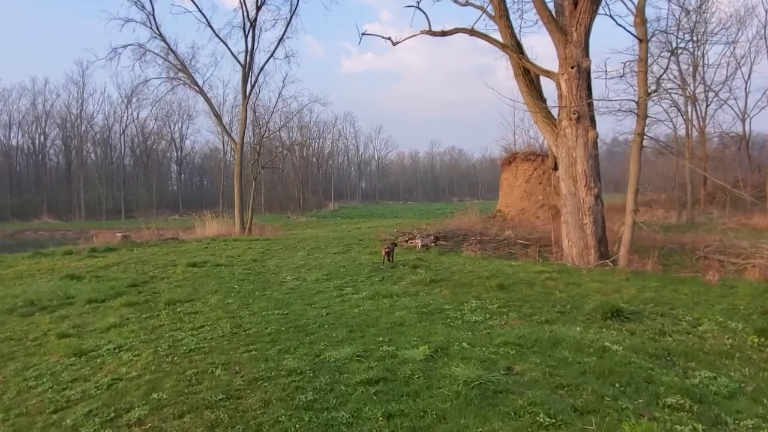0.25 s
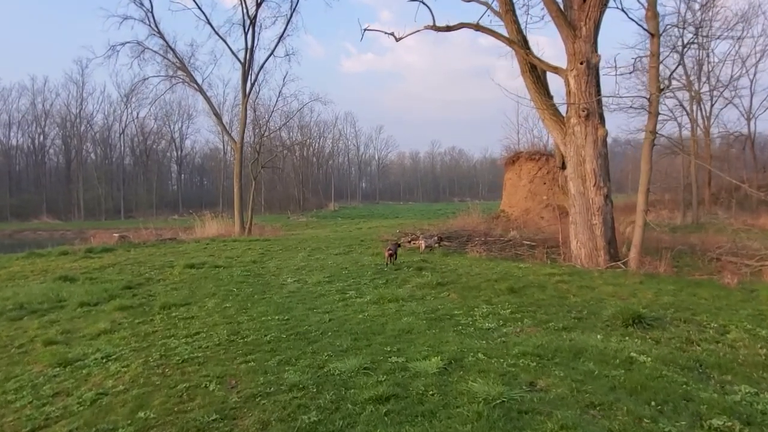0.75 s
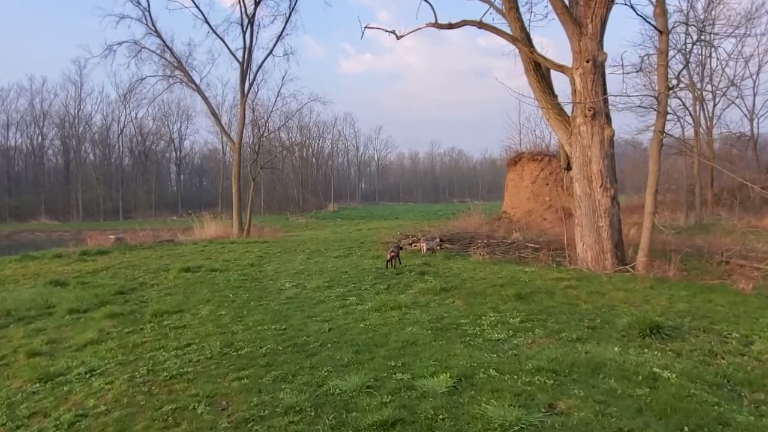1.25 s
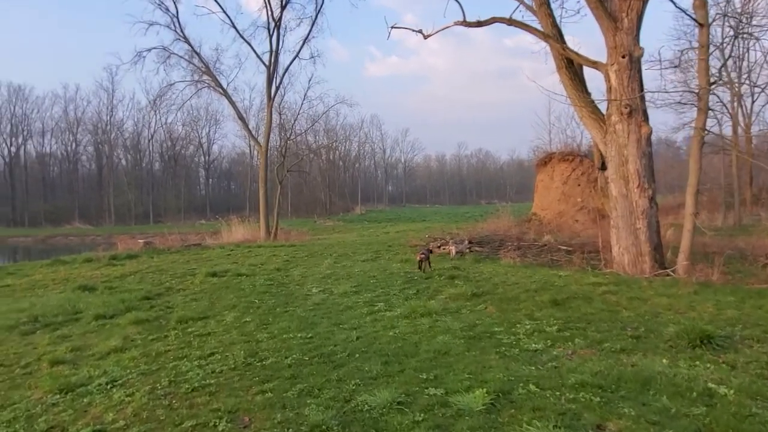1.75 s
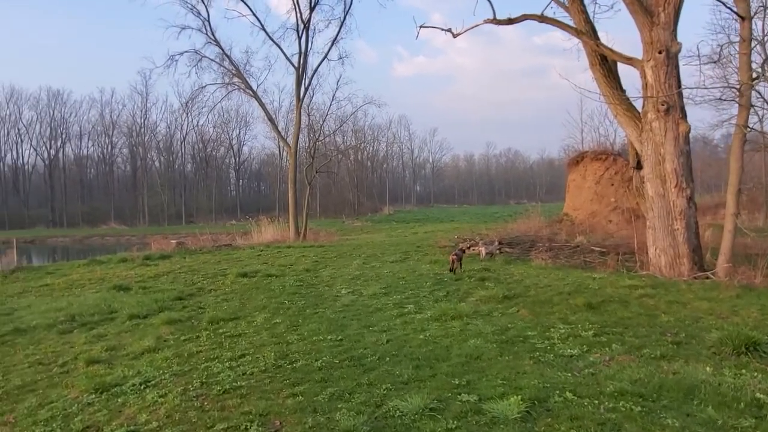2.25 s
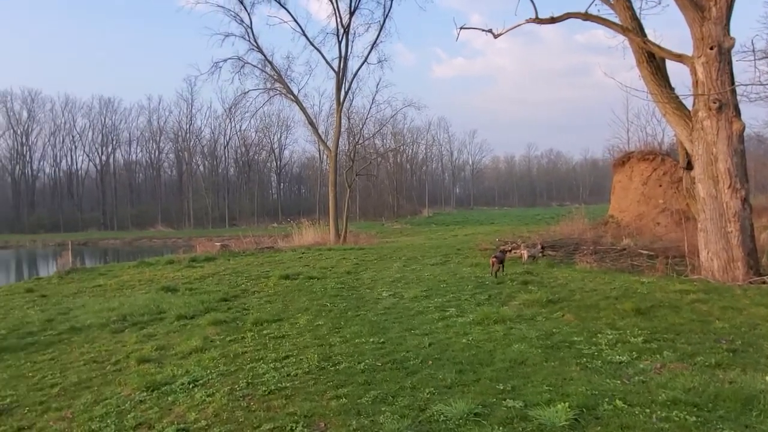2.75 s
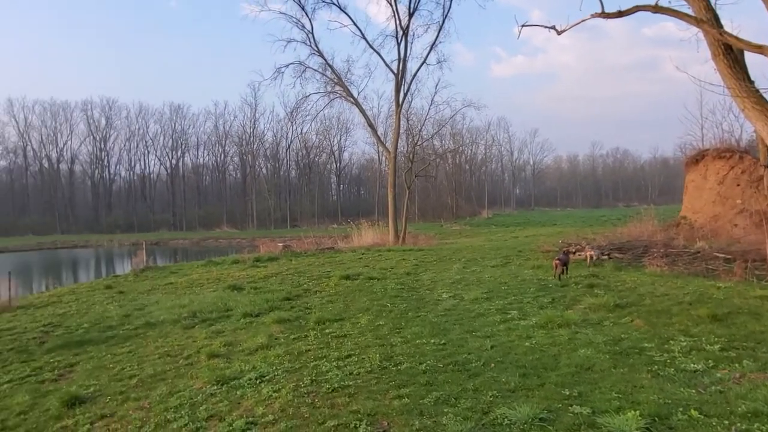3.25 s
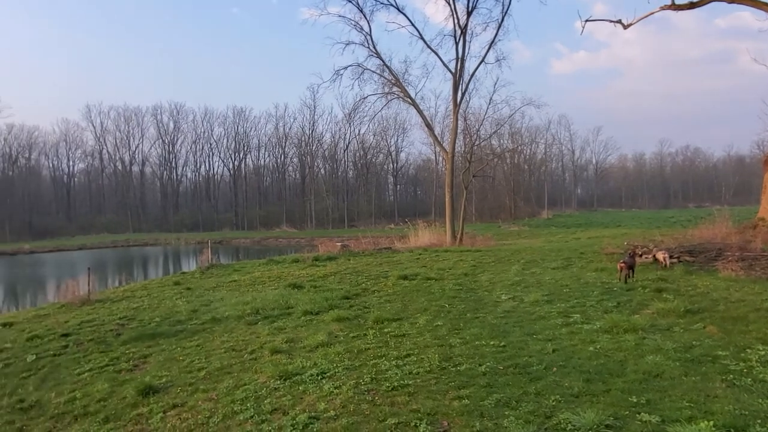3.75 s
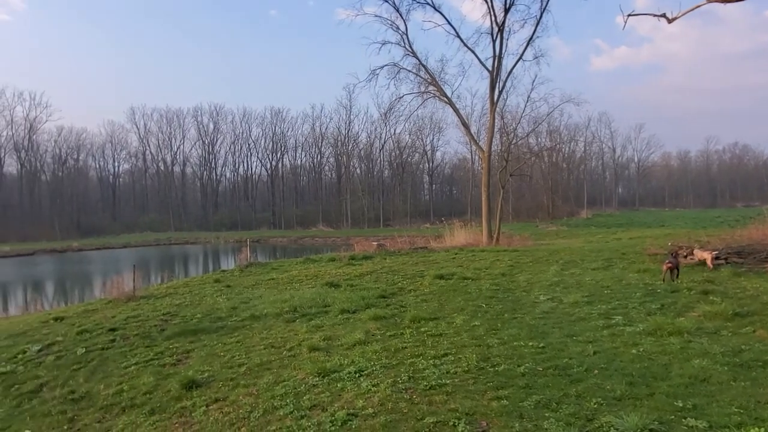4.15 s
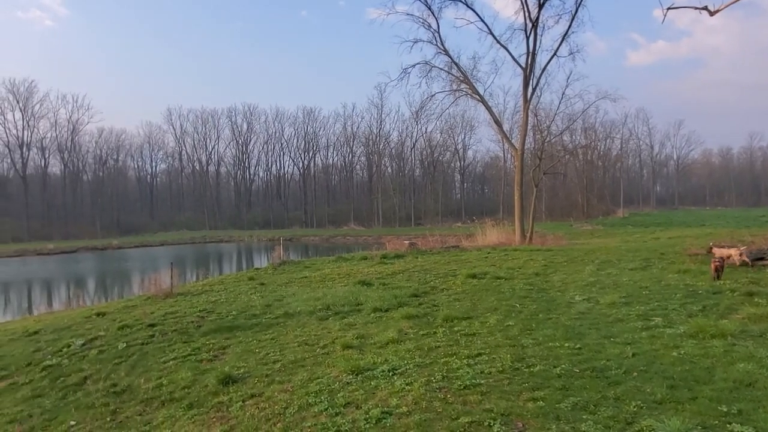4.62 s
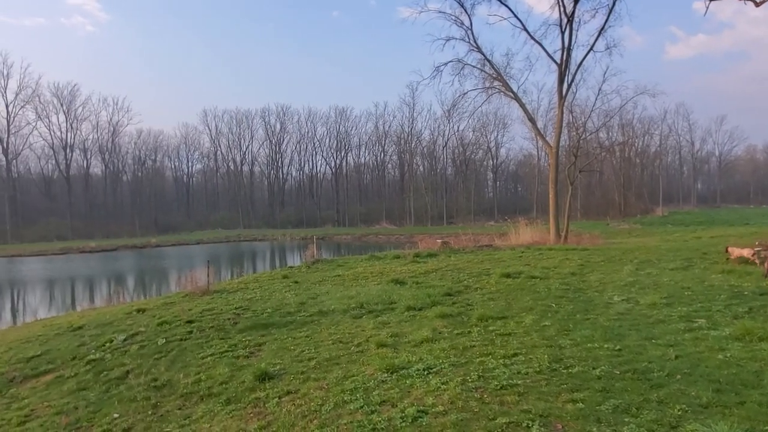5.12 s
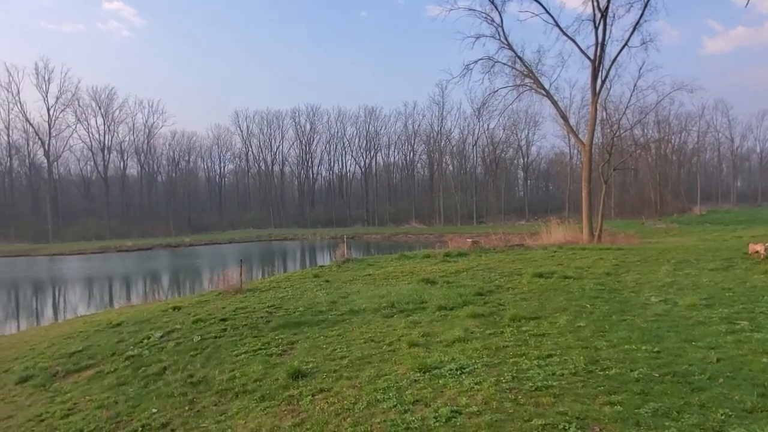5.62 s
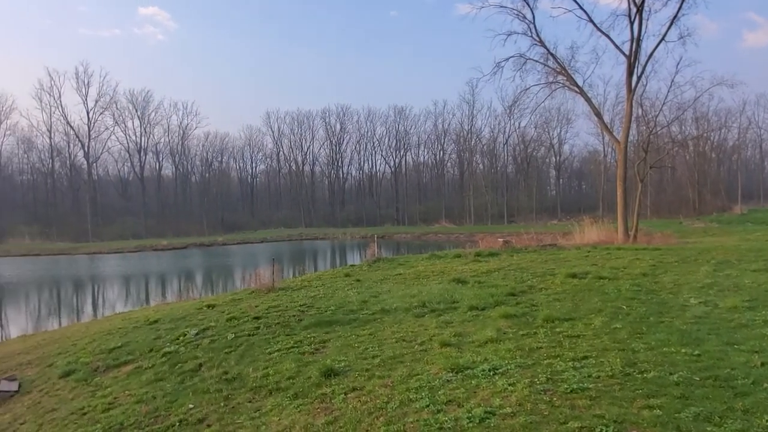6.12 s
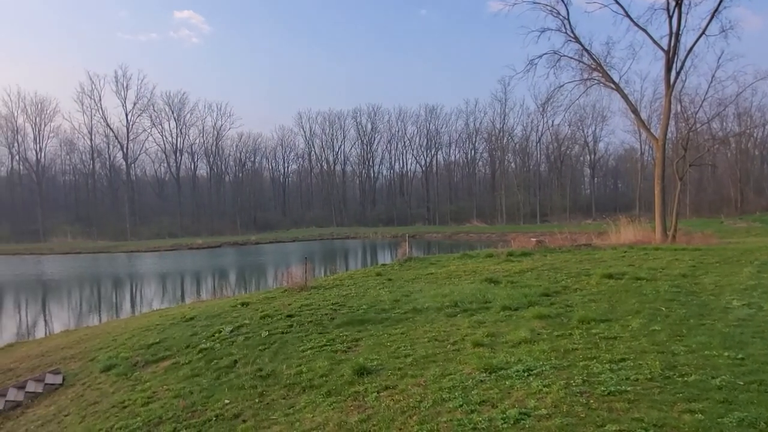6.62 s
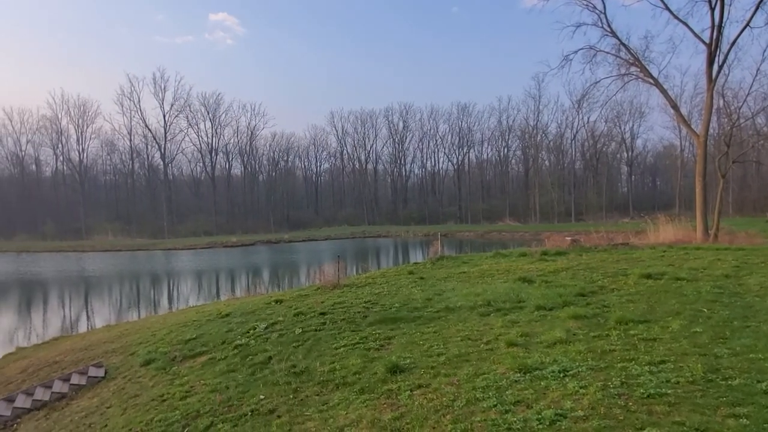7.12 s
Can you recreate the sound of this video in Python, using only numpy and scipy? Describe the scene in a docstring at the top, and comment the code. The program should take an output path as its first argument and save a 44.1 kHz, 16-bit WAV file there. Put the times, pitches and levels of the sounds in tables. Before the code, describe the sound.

Low wind rumbles and buffets the microphone, mostly on the right, while songbirds chirp, trill and buzz around a quiet meadow with faint grassy footsteps.

```python
"""Wind tumbles over two microphone ports, mostly the right one: noise shaped as rumble, flutter and eddies.
Songbirds whistle, trill and buzz: sine tones bent in pitch, chopped into beats or rung by pulses.
Someone walks through short grass: grainy noise swishes faintly underfoot and two stalks snap.
Behind lie filtered noise for still air and a far chorus, and the treeline's scattered echoes."""
import sys
import numpy as np
from scipy import signal
from scipy.fft import rfft, irfft
from scipy.io import wavfile
from scipy.ndimage import uniform_filter1d

SR = 44100
rng = np.random.default_rng(int(sys.argv[2]) if len(sys.argv) > 2 else 0)


def file_out(sig):
    """Save sig as 16-bit WAV at sys.argv[1]."""
    # one column per channel
    cols = np.atleast_2d(sig).T
    # limit, then scale
    lim = np.clip(cols, -1, 1)
    pcm = np.round(lim * 32767).astype(np.int16)
    wavfile.write(sys.argv[1], SR, pcm)


N = 325013
T = np.arange(N) / SR

# Spectrum of turbulent flutter. Each row: frequency in Hz, density in dB per Hz.
FLUTTER = [(50, -5.5), (130, 12.5), (260, -3.5), (480, -23.5), (1200, -72.5)]


def amp(db):
    """Logarithmic level: decibels to amplitude gain."""
    return 10 ** (np.asarray(db) / 20)


def unit(x):
    """Normalisation: scales a signal to rms 1."""
    return x / np.sqrt(np.mean(x ** 2) + 1e-20)


def curve(rows):
    """Linear interpolation over time: the value columns of a table whose first column is seconds."""
    s, *columns = np.transpose(rows)
    return [np.interp(T, s, c) for c in columns]


def add(mix, s, sound):
    """Superposition: adds a sound to the mix at time s."""
    part = mix[max(round(s * SR), 0):][:len(sound)]
    part += sound[:len(part)]


def envelope(start, length, attack_s, release_s):
    """Linear attack, hold to the end of the length, then exponential decay."""
    rise = np.clip((T - start) / attack_s, 0, 1)
    return rise * np.exp(-np.maximum(T - start - length, 0) / release_s)


def panned(x, left_db):
    """Interaural level difference: mono to stereo, left louder than right by left_db."""
    return np.array([x * amp(left_db / 2), x * amp(-left_db / 2)])


def placed(x, left_db, lead_s):
    """Interaural time difference: besides the level difference, the right port hears x later by lead_s."""
    left, right = panned(x, left_db)
    delay = np.exp(-2j * np.pi * np.fft.rfftfreq(N, 1 / SR) * lead_s)
    return np.array([left, irfft(rfft(right) * delay, N)])


def noise(spectrum):
    """Spectral shaping: Gaussian noise of rms 1 that falls off above the last point of its spectrum."""
    hz, db = np.transpose(spectrum)
    f = np.fft.rfftfreq(N, 1 / SR) + 1
    shape = amp(np.interp(np.log(f), np.log(hz), db)) / np.maximum(f / hz[-1], 1) ** 2
    return unit(irfft(rfft(rng.standard_normal(N)) * shape, N))


def drift(per_s, size=N):
    """Random modulation: noise of rms 1 under a Gaussian low-pass that is per_s Hz wide."""
    f = np.fft.rfftfreq(N, 1 / SR)
    return unit(irfft(rfft(rng.standard_normal(N)) * np.exp(-(f / per_s) ** 2), N))[:size]


def whistle(hz):
    """Frequency modulation: a sine of rms 1 whose phase integrates a pitch curve."""
    return np.sqrt(2) * np.sin(2 * np.pi * np.cumsum(hz) / SR)


def treeline(x, echo_db, t60=1.0):
    """Diffuse reflection: sparse echoes from trunks and quick ground scatter, different at each ear."""
    t = np.arange(SR) / SR
    taps = rng.standard_normal((2, SR)) * (rng.random((2, SR)) < 2000 / SR)  # 2000 echoes per s
    taps *= amp(-60 * t / t60) + 4 * np.exp(-t / 0.01)
    taps /= np.linalg.norm(taps, axis=1, keepdims=True)
    return x + amp(echo_db) * signal.fftconvolve(x, taps, axes=1)[:, :N]


def pressure():
    """Power addition: wind level in dB at the left and right port, gusts on top of the breeze."""
    # Each row: time in seconds, level in dB.
    left_breeze = [(.85, -34.5), (1.1, -39.5), (2.6, -48.5), (4.2, -46), (5.1, -37), (5.35, -34.5),
                   (6.05, -39.5), (7.2, -28)]
    right_breeze = [(0, -33), (1, -36), (1.5, -33), (4.15, -28), (4.42, -43), (4.62, -31), (5.4, -39.5),
                    (6.05, -42), (6.9, -23.5)]
    # Gusts. Each row: start in seconds, length in seconds, left level in dB, right level in dB.
    gusts = [(0.648, 0.098, -40, -29), (2.134, 0.14, -52, -27), (3.01, 0.19, -48.5, -19),
             (3.289, 0.12, -54.5, -19.5), (3.512, 0.303, -39.5, -21.5), (4.108, 0.15, -58.5, -24),
             (4.677, 0.22, -59, -25), (5.487, 0.015, -30, -24.5), (5.656, 0.245, -31, -26.5),
             (6.118, 0.16, -32.5, -24.5), (6.387, 0.17, -28, -25.5), (6.981, 0.27, -36, -27.5),
             (7.309, 0.1, -31, -15)]
    power = amp(curve(left_breeze) + curve(right_breeze)) ** 2
    for s, length, left_db, right_db in gusts:
        gust = envelope(s, length, attack_s=0.011, release_s=0.035)
        power += (amp([[left_db], [right_db]]) * gust) ** 2
    return 10 * np.log10(power)


def wind(level_db, flutter_db, steepness):
    """Turbulence at a port: low rumble that breaks into brighter, lumpy flutter as the wind strengthens."""
    # Rumble spectrum. Each row: frequency in Hz, density in dB per Hz.
    rumble_spectrum = [(12, -7.5), (35, -4), (68, 5), (110, -7), (165, -27.5), (300, -49.5), (700, -73.5)]
    rumble = noise(rumble_spectrum)
    local_power = uniform_filter1d(rumble ** 2, round(SR * .07))
    rumble = unit(rumble / np.sqrt(local_power + 1e-6))  # the gust alone sets the strength
    excess_db = steepness * np.clip(level_db + 26, -10, 2)  # calm air flows smoothly
    lumps_db = 6.58 * drift(58) + 3.08 * rumble
    flutter = unit(noise(FLUTTER) * amp(lumps_db))
    return amp(level_db) * (rumble + amp(flutter_db + excess_db) * flutter)


def background():
    """Broadband ambience: still air over the meadow, and a band of far chorus that swells and fades."""
    # Hush of the meadow. Each row: frequency in Hz, density in dB per Hz.
    air_spectrum = [(350, -4), (900, -15.5), (1400, -14), (2100, -17.5), (3100, -11.5), (4600, -23),
                    (6000, -29.5), (9000, -32), (15500, -27.5)]
    # Each row: time in seconds, level of the air in dB.
    air_level = [(.7, -69.5), (2.5, -68), (5.3, -71)]
    # Chorus phrases. Each row: start in seconds, length in seconds, level in dB.
    chorus_phrases = [(1.513, 0.51, -72.5), (2.739, 0.71, -71), (5.686, 1, -79)]
    # Chorus spectrum. Each row: frequency in Hz, density in dB per Hz.
    chorus_spectrum = [(900, -34), (1250, 0.5), (1530, 0), (2000, -26.5)]
    air = np.array([noise(air_spectrum) * amp(drift(8.0)) for _ in range(2)]) * amp(curve(air_level))
    swell = amp(-89.5)  # the chorus never quite stops
    for s, length, db in chorus_phrases:
        swell = swell + amp(db) * envelope(s, length, attack_s=0.17, release_s=0.097)
    chorus = unit(noise(chorus_spectrum) * amp(2 * drift(33))) * swell
    return air * amp([[1], [-1]]) + panned(chorus, 1.5)


def buzz(s, length, db, per_s, hz, throat=(), pulse_hz=425, jitter=0.025, stumble=0.022, throb=1):
    """Amplitude modulation and resonance: a tone in beats; between them pulses ring any throat modes."""
    t, lag = np.arange(0, length, 1 / SR), np.arange(-300, 301) / SR
    beat = np.cumsum(per_s * (1 + stumble * drift(74, len(t)))) / SR
    tone = whistle(hz * (1 + .012 * drift(90, len(t))))
    out = unit(abs(np.sin(np.pi * beat)) ** 2.5) * tone
    turns = np.cumsum(pulse_hz * (1 + jitter * drift(200, len(t)))) / SR
    pulses = np.diff(np.floor(turns), prepend=0)
    pulses = pulses * np.exp(throb * np.cos(2 * np.pi * beat))  # strongest between the beats
    for mode_hz, width, mode_db in throat:
        ring = np.exp(-2 * (width * lag) ** 2 * np.pi) * np.cos(2 * np.pi * mode_hz * lag)
        rasp = signal.fftconvolve(pulses * amp(2 * drift(60, len(t))), ring, "same")
        out += amp(mode_db) * unit(rasp)
    level_db = db - 3 * (t / length) ** 4 + drift(41, len(t))  # weakens towards its end
    return s, amp(level_db) * out * signal.windows.tukey(len(t), .03)


def trills_and_buzzes():
    """Localisation by level and arrival time: fast songs from among the trees, most of them to the left."""
    # Far buzzes. Each row: start in seconds, length in seconds, level in dB, beats per second.
    far_buzzes = [(0, 0.41, -78.5, 55), (2.881, 0.56, -63.5, 74)]
    # Each row: start, length and fall time in seconds, first and last top pitch in Hz,
    # level in dB, level of the second voice in dB.
    trill_rows = [(1.945, .455, .24, 5080, 3300, -56.5, -73), (2.507, .43, .1, 4900, 3800, -57.5, -69),
                  (6.416, .255, .16, 5150, 4200, -56, -72), (6.756, .335, .15, 4850, 3100, -54.5, -63.5)]
    # One row each: start in seconds, length in seconds, level in dB, beats per second, pitch in Hz.
    soft_buzz = (4.067, .655, -58, 61.8, 2800)
    harsh_buzz = (5.858, .65, -53.5, 68.5, 2925)
    # Throat resonances. Each row: frequency in Hz, width in Hz, level in dB.
    soft_throat = [(3160, 740, -4), (4910, 1000, -16.5)]
    harsh_throat = [(3280, 53, -7), (3500, 1320, -5), (5035, 800, -8)]
    # High voice of the harsh buzz. One row: top pitch in Hz, arches per second, level in dB.
    harsh_top = (5430, 32.5, -59)
    # Pulsed note. One row: start in seconds, length in seconds, pitch in Hz, pulses per second, level in dB.
    pulsed_note = (7.28, .09, 2675, 50, -59)
    trills, soft, ahead = np.zeros((3, N))
    for row in far_buzzes:
        add(ahead, *buzz(*row, hz=2960))
    for s, length, fall_s, first_hz, last_hz, db, second_db in trill_rows:
        add(trills, *plunging_trill(s, length, fall_s, first_hz, last_hz, db))
        # the second voice outlasts the first
        add(trills, *second_voice(s + fall_s, length - fall_s + .05, second_db))
    add(soft, *buzz(*soft_buzz, soft_throat, jitter=0.054))
    add(ahead, *buzz(*harsh_buzz, harsh_throat, stumble=.35, throb=.3))
    add(ahead, *trill(*harsh_buzz[:2], *harsh_top, sweep=.2))
    add(ahead, *trill(*pulsed_note, sweep=0.22))
    songs = placed(trills, 6.85, 0.0003) + placed(soft, 9.7, -0.00013) + placed(ahead, 0.88, 0.00027)
    return treeline(songs, echo_db=-5)


def snaps():
    """Impulsive fracture: dry stalks crack underfoot in bursts of band noise that decay exponentially."""
    # Each row: start in seconds, level in dB, centre in Hz, ring time in seconds, left minus right in dB.
    snap_rows = [(0.232, -57, 14100, 0.001, 13), (0.667, -58.5, 860, 0.03, -2)]
    out = np.zeros((2, N))
    for s, db, hz, ring_s, left_db in snap_rows:
        burst = noise([(hz / 4, -25), (hz * 0.64, 0), (hz * 1.3, -2), (hz * 4, -20)])
        decay = (T >= s) * np.exp(-abs(T - s) / ring_s)
        out += panned(amp(db) * burst * decay, left_db)
    return out


def notes(rows, waver, taper):
    """Pitch glide: each note bends along a parabola through three pitches and swells in the middle."""
    out, wobble, flicker = np.zeros(N), drift(160), drift(76)
    for s, length, first, middle, last, db in rows:
        at = np.flatnonzero((T >= s) & (T < s + length))
        bend = np.polyfit([0, .5, 1], [first, middle, last], 2)
        hz = np.polyval(bend, np.linspace(0, 1, len(at))) * (1 + waver * wobble[at])
        swell = unit(signal.windows.tukey(len(at), taper) * amp(2 * flicker[at]))
        add(out, s, amp(db) * swell * whistle(hz))
    return out


def thin_song():
    """Downward glide: each thin note sags a little, then drops away in a quick, faint tail."""
    # Each row: start in seconds, pitch in Hz, level in dB.
    thin_notes = [(0.267, 4590, -73), (0.524, 4640, -75), (0.744, 4550, -74), (0.924, 4580, -73.5),
                  (1.065, 4800, -74), (1.196, 4860, -70), (1.323, 4826, -70), (1.452, 4770, -77)]
    held_s, sag = .046, .02  # sag and drop are fractions of the pitch
    tail_s, drop, tail_db = .03, .27, -11
    held = [(s, held_s, hz, hz * (1 - sag / 2), hz * (1 - sag), db) for s, hz, db in thin_notes]
    tails = [(s + held_s, tail_s, hz, hz * (1 - drop / 2), hz * (1 - drop), db + tail_db)
             for s, _, _, _, hz, db in held]
    return notes(held + tails, waver=0.0026, taper=0.5)


def chips():
    """Random frequency modulation: a chip is a whistle whose pitch shakes so fast that it rasps."""
    # Each row: start in seconds, centre pitch in Hz, level in dB.
    chip_rows = [(.285, 4060, -67.5), (0.432, 3460, -68.5), (1.372, 3420, -62.5), (3.295, 3706, -51.5),
                 (4.054, 4390, -53), (5.629, 2596, -55), (5.823, 2640, -56), (7.31, 3950, -59)]
    shake = 1 + 0.073 * drift(500)
    out = np.zeros(N)
    for s, hz, db in chip_rows:
        out += amp(db) * envelope(s, 0.011, attack_s=0.00081, release_s=0.013) * whistle(hz * shake)
    return out


def whistles(arch_foot=.75, sag=0.028):
    """Pure tones with echoes: slurs, chips and chirps from the left; thin notes, pipes and coos ahead."""
    # Slurs, then a far hoot and a louder note about an octave up.
    # Each row: start in seconds, length in seconds, first, middle and last pitch in Hz, level in dB.
    slurs = [(1.45, 0.041, 2940, 3040, 2840, -64.5), (2.575, 0.057, 2680, 2870, 2500, -56.5),
             (2.635, 0.039, 2240, 2650, 2420, -49.5), (2.68, 0.13, 2400, 1992, 2310, -68),
             (3.06, 0.12, 2350, 2750, 3530, -58), (3.17, 0.067, 3220, 2980, 1950, -55.5),
             (3.31, 0.11, 2124, 2490, 2555, -58.5), (3.65, 0.07, 3360, 3410, 2720, -56.5),
             (3.712, 0.026, 3320, 3100, 2750, -49.5), (3.85, 0.058, 2550, 2250, 2330, -58.5),
             (4.175, 0.06, 3800, 3925, 3300, -54.5), (4.36, 0.055, 4330, 3510, 3240, -59),
             (4.51, 0.08, 3900, 3530, 3130, -66), (4.675, 0.066, 3680, 3496, 3270, -64),
             (4.86, 0.085, 6480, 5880, 5230, -77.5), (5.836, 0.023, 5030, 5180, 5400, -49.5)]
    hoot = [(5.16, 0.36, 895, 945, 858, -81.5), (5.28, 0.13, 1884, 1852, 1828, -57.5)]
    # Arched chirps, low arched coos. Each row: start in seconds, length in seconds, top pitch in Hz, level in dB.
    arch_rows = [(1.508, .048, 3520, -73), (1.57, 0.042, 5900, -76.5), (1.838, 0.026, 4760, -62.5),
                 (3.086, 0.029, 4990, -57), (3.22, 0.027, 4480, -58.5), (3.817, 0.11, 3175, -52.5),
                 (4.977, 0.042, 4460, -58.5), (5.127, 0.043, 4890, -59.5), (5.14, 0.014, 1685, -59),
                 (5.588, 0.022, 1523, -56)]
    coo_rows = [(6.352, .11, 1550, -73), (6.618, .115, 1540, -71), (6.99, .108, 1540, -70)]
    # Level pipes. Each row: start in seconds, length in seconds, pitch in Hz, level in dB.
    pipe_rows = [(1.475, 0.039, 2715, -63.5), (1.534, 0.044, 2737, -69), (1.65, 0.023, 3120, -66.5),
                 (1.882, 0.062, 6850, -68.5), (3.489, 0.2, 1593, -67), (3.765, 0.061, 2120, -68.5),
                 (3.993, 0.03, 1247, -68), (4.871, 0.037, 4580, -69.5), (5.656, 0.059, 1269, -62.5),
                 (5.708, 0.13, 2583, -56), (5.74, 0.061, 6360, -78.5), (7.16, 0.068, 2098, -71)]

    def arched(rows):
        """Symmetric glide: pitch rises from a foot to the top and returns."""
        return [(s, length, hz * arch_foot, hz, hz * arch_foot, db) for s, length, hz, db in rows]

    pipes = [(s, length, hz, hz, hz * (1 - sag), db) for s, length, hz, db in pipe_rows]  # sag at the end
    arches = arched(list(arch_rows) + chirp_run())
    chirps = notes(list(slurs) + arches, waver=0.015, taper=0.49) + chips()
    ahead = thin_song() + notes(pipes + list(hoot), waver=0.0024, taper=0.61)
    ahead += notes(arched(coo_rows), waver=0.0088, taper=0.067)
    chirps, ahead = placed(chirps, 4, .0003), panned(ahead, -0.66)
    return treeline(chirps, echo_db=-3.5) + treeline(ahead, echo_db=-2.5)


def grass(grain_db=4, half_s=0.034):
    """Friction noise: blades brush and crackle under Gaussian strokes, mostly on the right."""
    # Each row: time of the peak in seconds, level in dB.
    swishes = [(.485, -72.5), (1.87, -75), (2.472, -73), (2.535, -71), (2.74, -76), (2.991, -69.5),
               (3.211, -62), (3.436, -68.5), (3.669, -72.5), (3.919, -74), (5.541, -73.5), (6.335, -84)]
    # Spectrum of the blades. Each row: frequency in Hz, density in dB per Hz.
    blades = [(4500, -5), (7500, -13), (11000, -2.5), (15500, -7.5)]
    stroke = sum(amp(db) * np.exp(-((T - s) / half_s) ** 2) for s, db in swishes)
    grains = amp(grain_db * drift(460))
    rustle = np.array([unit(noise(blades) * grains) for _ in range(2)])
    return rustle * panned(stroke, -11.5)


def trill(s, length, top_hz, per_s, db, sweep):
    """Periodic frequency modulation: fast, uneven pitch arches of varying height, loudest after the top."""
    size = round(length * SR)
    turn = np.pi * (np.cumsum(per_s * (1 + .11 * drift(40, size))) / SR % 1)
    arch = np.sin(turn)
    hz = top_hz * (1 - sweep * (1 - arch ** .8 + .06 * drift(75, size)))
    late_weight = 1 - .5 * np.cos(turn)
    loudness = unit(arch ** 1.6 * late_weight * amp(2.7 * drift(55, size)))
    return s, amp(db) * loudness * whistle(hz) * signal.windows.tukey(size, .03)


def plunging_trill(s, length, fall_s, first_hz, last_hz, db):
    """Coupled pitch, rate and level: a plunge, then a part climb or slower fall; low arches are fast and weak."""
    t = np.arange(round(length * SR)) / SR
    top_hz = np.interp(t, [0, fall_s, length], [first_hz, 3600, last_hz])
    per_s = 45 * (first_hz / top_hz) ** 1.25
    octaves = np.log2(top_hz / first_hz)
    level_db = db + 9 * octaves - 2.5 * t / length
    return trill(s, length, top_hz, per_s, level_db, sweep=0.57)


def second_voice(s, length, db):
    """Two-source voicing: the other side of the bird's throat adds quick, climbing arches that swell."""
    u = np.linspace(0, 1, round(length * SR))
    top_hz = 4000 + (4400 - 4000) * u
    s, voice = trill(s, length, top_hz, 100, db, sweep=.35)
    return s, voice * unit(np.sin(np.pi * u ** 2))


def eddies(churn_db=-16, churn_s=0.0067, low_hz=60, high_hz=105):
    """Vortex pressure dips: each swings the right port and leaves a brief churn; the tightest scuff."""
    # Each row: time in seconds, level in dB, half width in seconds.
    eddy_rows = [(2.238, -10, 0.002), (3.037, -13, 0.00039), (3.117, -12, 0.00047), (3.645, -13, 0.0012),
                 (3.072, -15.5, 0.00054), (4.119, -4.5, 0.00053), (4.231, -8.5, 0.0016),
                 (4.698, -13, 0.0012), (4.739, -20.5, .001), (4.79, -27, 0.00032), (4.798, -6, 0.0026),
                 (6.954, -6, 0.00099), (7.321, -8.5, 0.0017)]
    scuff_db, tight_s = -25, .0005
    out, churn, scuff = np.zeros((3, N))
    t = np.arange(-SR // 20, SR // 20) / SR
    port = signal.butter(1, [low_hz, high_hz], "band", fs=SR, output="sos")
    for s, db, width_s in eddy_rows:
        dip = signal.sosfilt(port, -1 / (1 + (t / width_s) ** 2))
        add(out, s + t[0], amp(db) * dip / abs(dip).max())
        swirl = amp(db) * np.exp(-((T - s) / churn_s) ** 2)
        churn += swirl
        scuff += swirl * np.exp(-(width_s / tight_s / 2) ** 2)
    out += amp(churn_db) * churn * noise(FLUTTER)
    out += amp(scuff_db) * scuff * noise([(650, 0)])  # flat to 650 Hz, falling above
    return signal.sosfilt(signal.butter(4, 760, fs=SR, output="sos"), out)


def chirp_run(count=6):
    """Regular rhythm: rows of like arched chirps at an even pace, loudest in the middle of the run."""
    start_s, step_s, note_s = 3.498, .1062, .049
    top_hz, middle_db, ends_db = 4380, -55.5, -4  # ends_db is relative to the middle
    return [(start_s + k * step_s, note_s, top_hz, middle_db + ends_db * u ** 2)
            for k, u in enumerate(np.linspace(-1, 1, count))]


def scene():
    """Linear superposition: wind at the ports over the birds, the grass and the background."""
    left_db, right_db = pressure()
    left = wind(left_db, flutter_db=-7.5, steepness=0.99)
    right = wind(right_db, flutter_db=-10.0, steepness=1.95) + eddies()
    birds = trills_and_buzzes() + whistles()
    return np.array([left, right]) + birds + grass() + snaps() + background()


def record(dry):
    """Band limitation: the recorder as a linear-phase low-pass at 15.8 kHz."""
    low_pass = signal.firwin(511, 15800, window=("kaiser", 9), fs=SR)
    return signal.oaconvolve(dry, low_pass[None], "same")


dry = scene()
out = record(dry)
file_out(out)
```